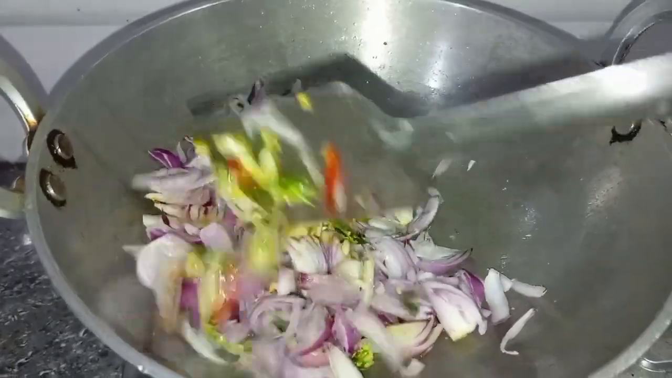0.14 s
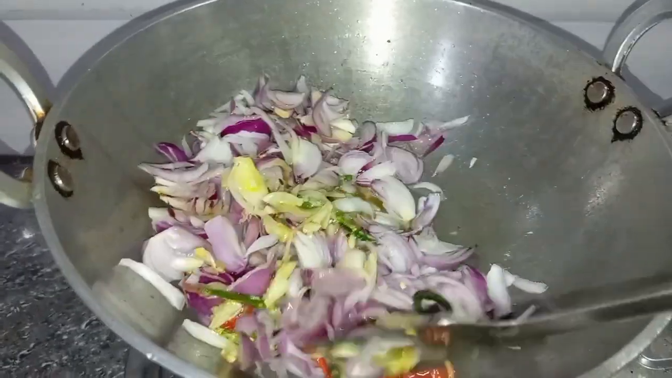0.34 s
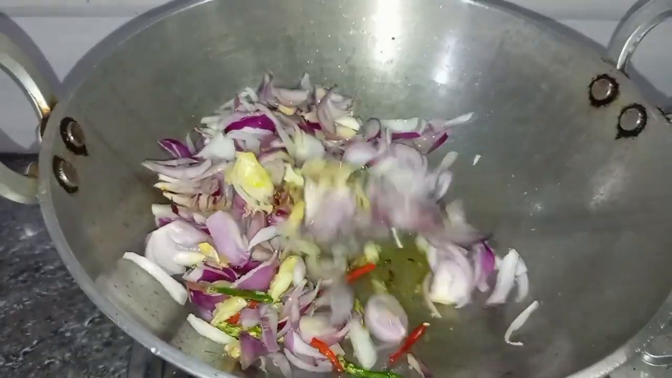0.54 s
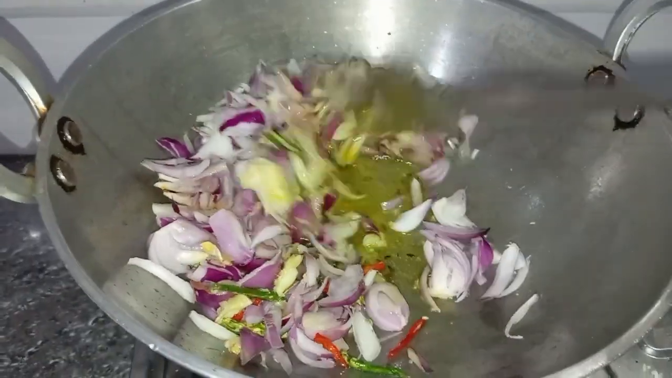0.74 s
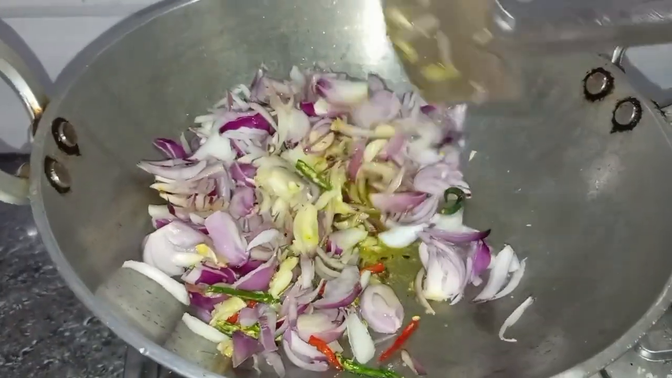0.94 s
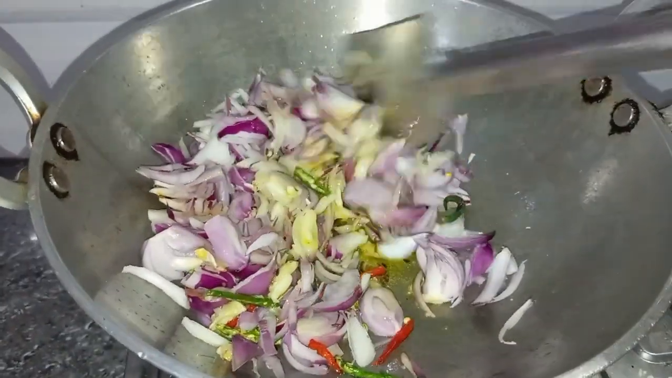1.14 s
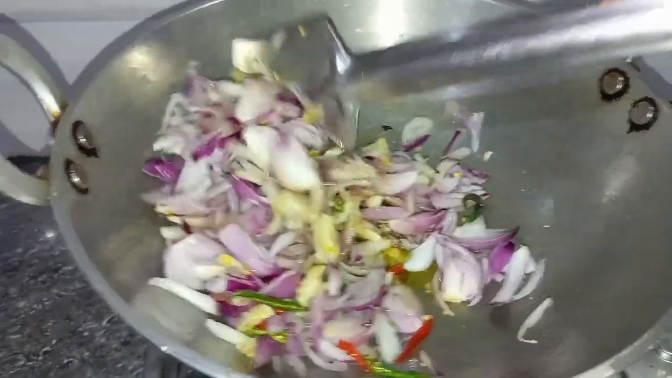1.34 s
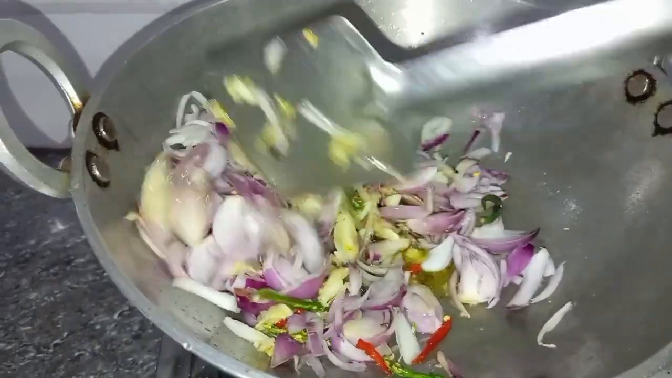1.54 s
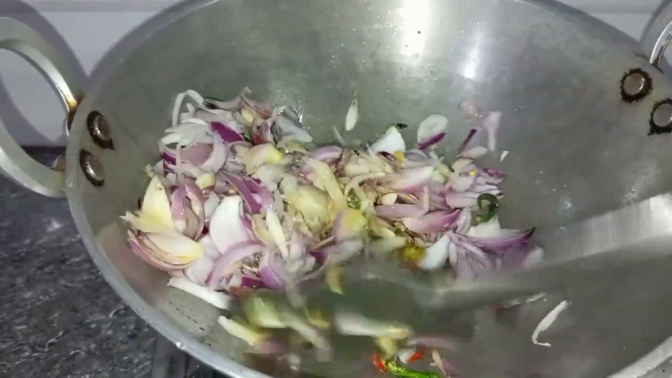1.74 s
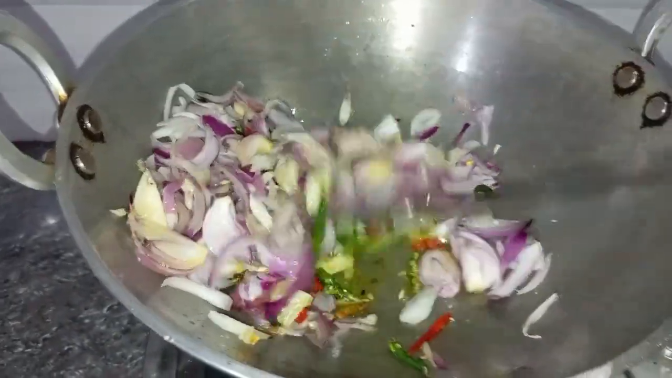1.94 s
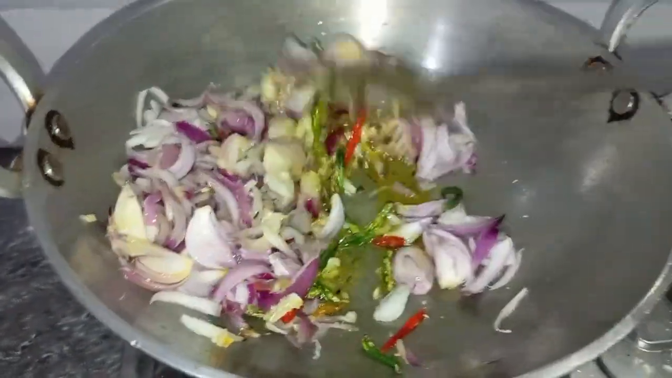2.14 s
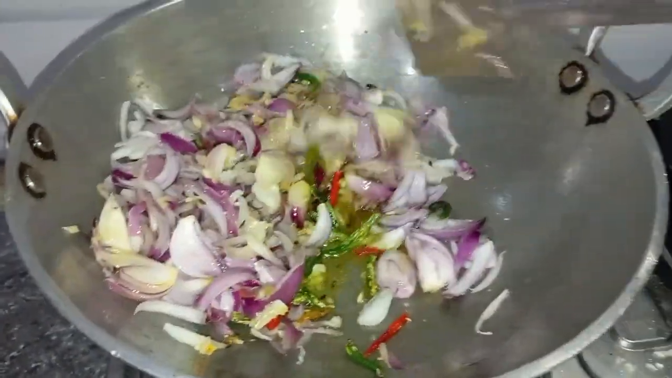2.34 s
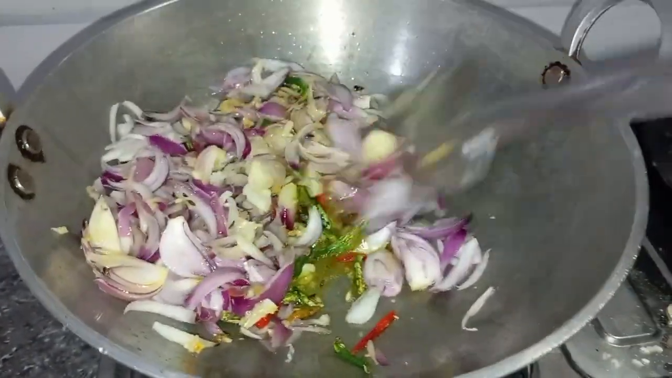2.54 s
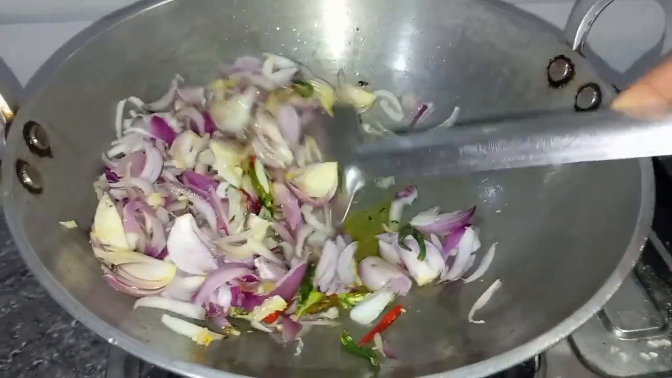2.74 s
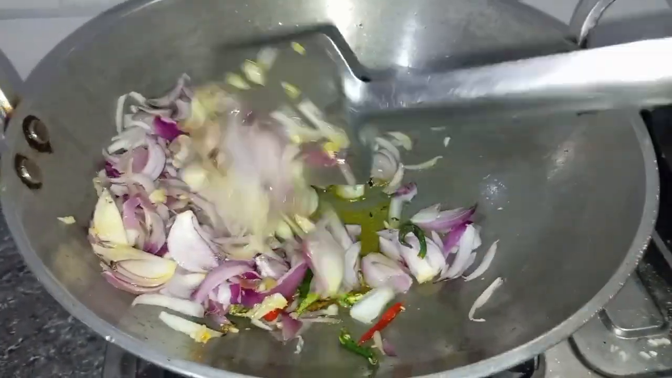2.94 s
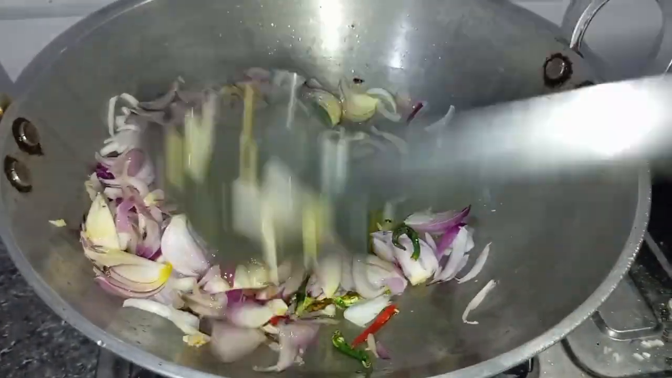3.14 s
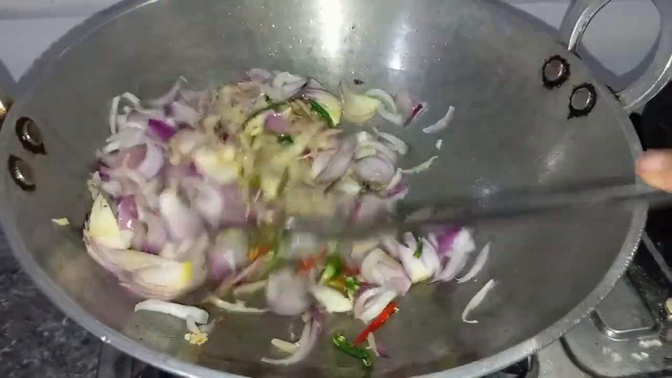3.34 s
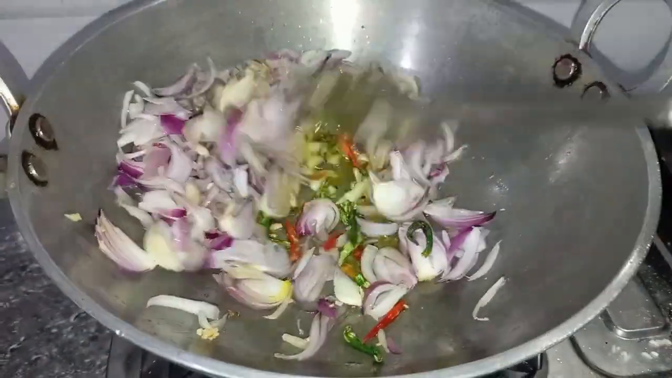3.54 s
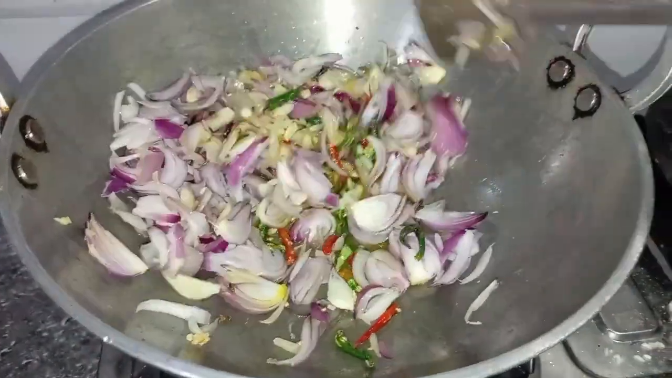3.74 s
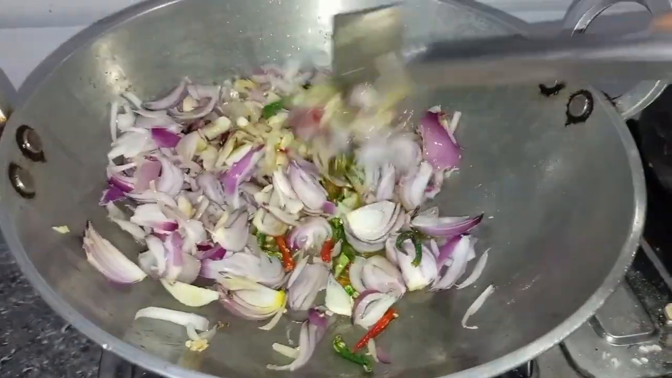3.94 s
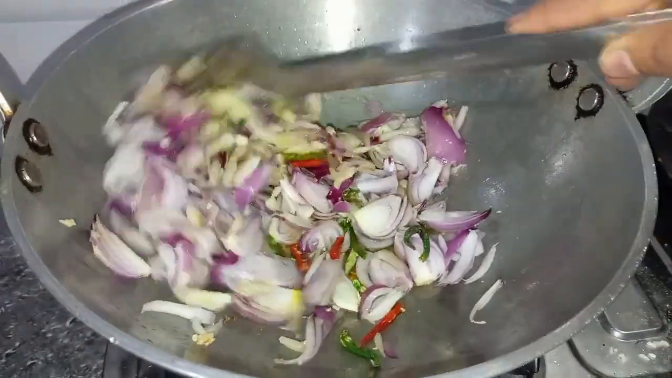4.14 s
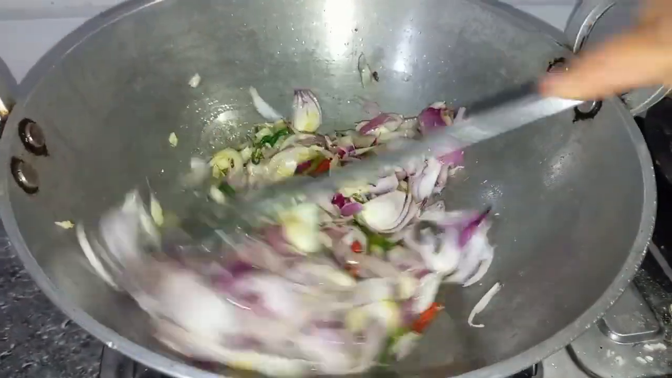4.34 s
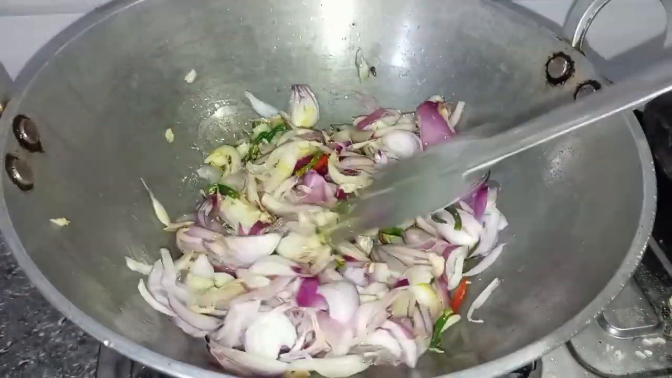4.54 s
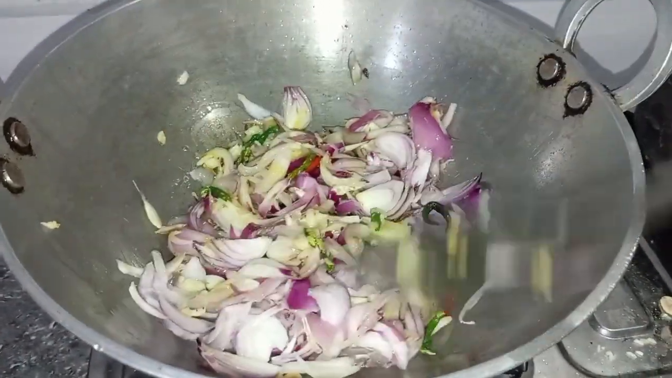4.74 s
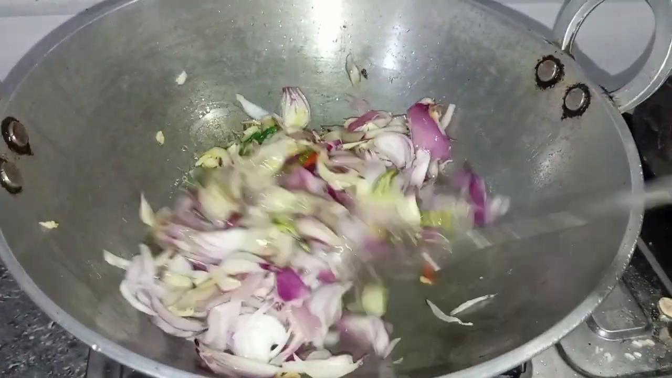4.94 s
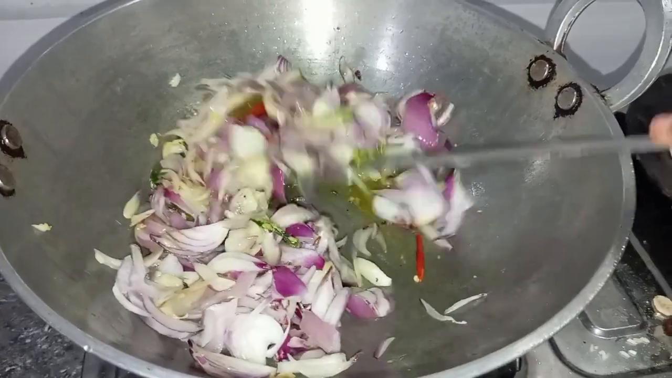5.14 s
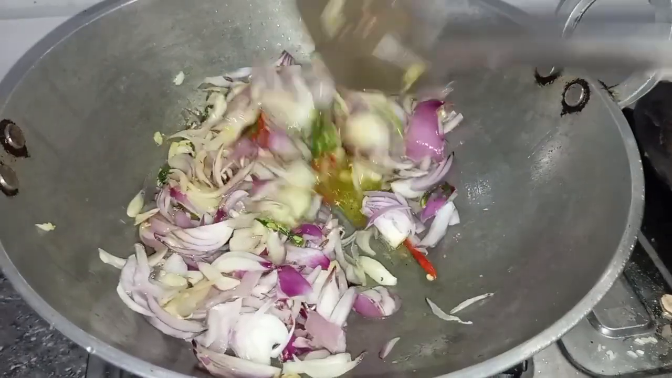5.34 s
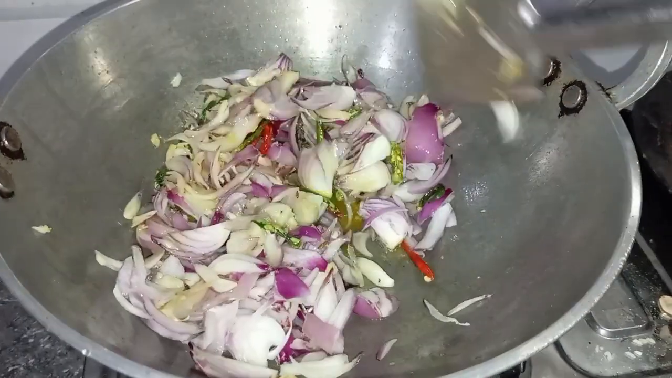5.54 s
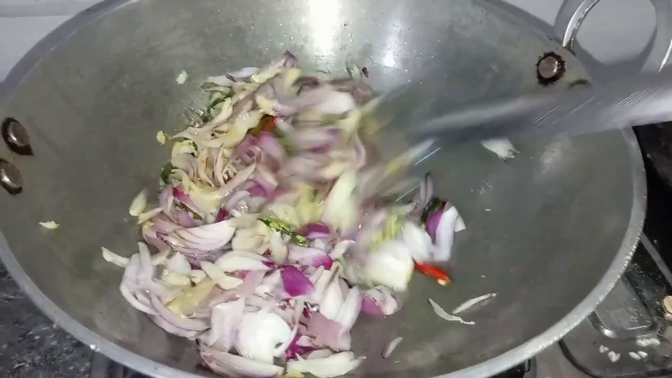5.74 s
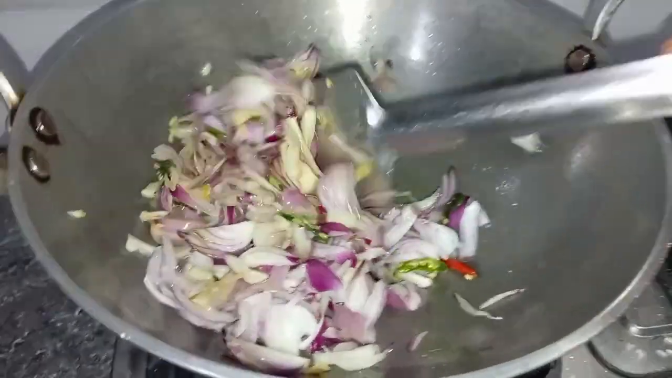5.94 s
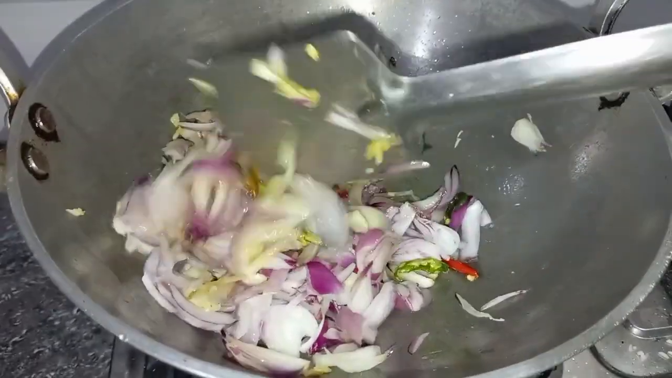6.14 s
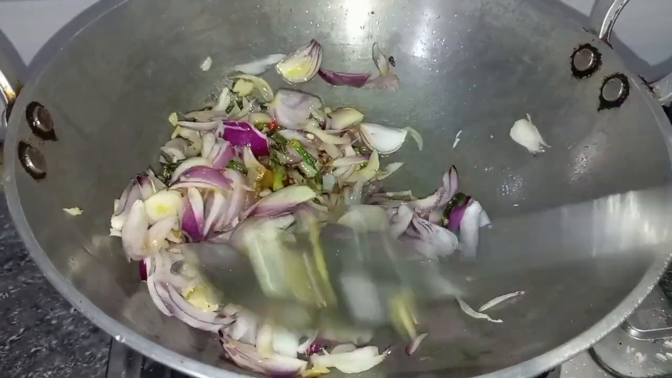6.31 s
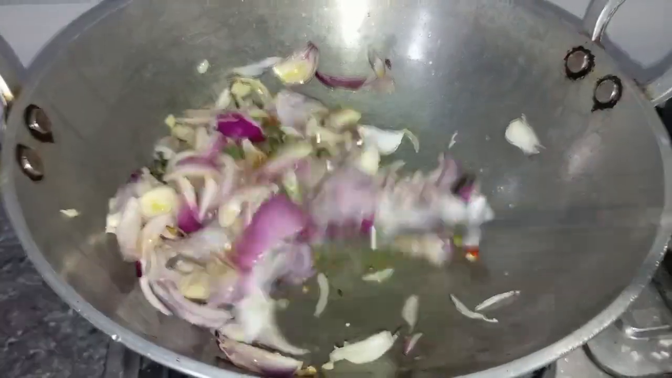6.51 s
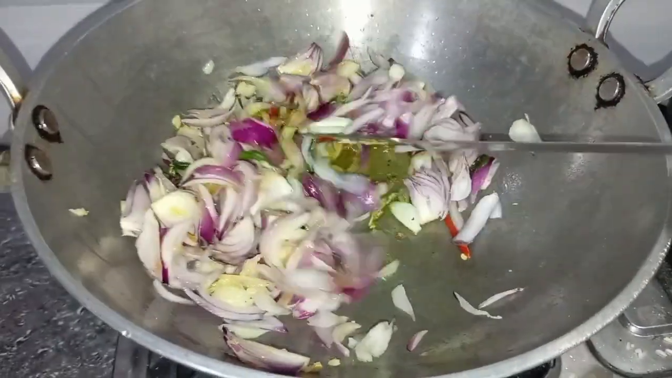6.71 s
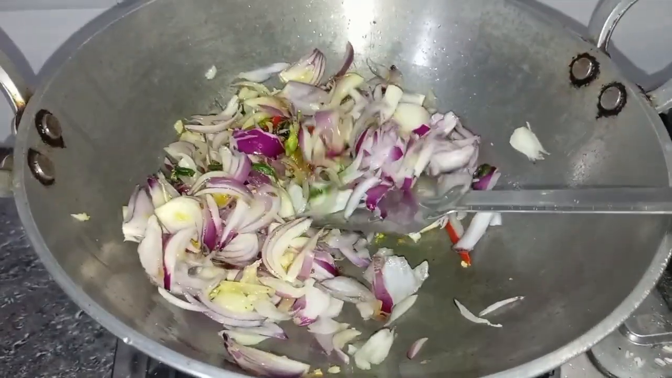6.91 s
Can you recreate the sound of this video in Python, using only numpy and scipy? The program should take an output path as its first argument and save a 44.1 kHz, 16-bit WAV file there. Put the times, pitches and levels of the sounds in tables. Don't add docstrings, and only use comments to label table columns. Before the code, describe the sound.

Close-up frying: steady onion sizzle with spitting droplets, broken by bright metal spatula clanks and gritty ringing scrapes on a pan.

```python
import sys
import numpy as np
from scipy import signal
from scipy.fft import rfft, irfft, next_fast_len
from scipy.io import wavfile
from scipy.ndimage import uniform_filter1d, minimum_filter1d

SR = 44100
rng = np.random.default_rng(int(sys.argv[2]) if len(sys.argv) > 2 else 0)


def rack_gain(trim_db):
    fader = np.asarray(trim_db, float)
    return 10 ** (fader / 20)


def transcribe(u):
    v = np.clip(np.atleast_2d(u).T, -1, 1)
    q = np.round(v * 32767).astype(np.int16)
    wavfile.write(sys.argv[1], SR, q)


N = 311919


def rms_one(x):
    return x / np.sqrt(np.mean(x ** 2) + 1e-20)


def in_time(rows):
    s, *columns = np.transpose(rows)
    return [np.interp(np.arange(N) / SR, s, c) for c in columns]


def add_at(out, s, sound):
    at = round(s * SR)
    out[at:at + len(sound)] += sound


def band(x, low_hz, high_hz):
    edges = [low_hz, min(high_hz, .4 * SR)]
    return signal.sosfilt(signal.butter(2, edges, "band", fs=SR, output="sos"), x)


def ring(x, hz, width_hz):
    r, w = np.exp(-np.pi * width_hz / SR), 2 * np.pi * hz / SR
    return signal.lfilter([.5, 0, -.5], [1, -2 * r * np.cos(w), r * r], x + 1e-18)


def focus(x, hz):
    width_hz = .12 * hz
    return ring(x, hz, width_hz) * 2 * np.pi * width_hz / SR


def sing(x, hz, width_hz):
    return ring(x, hz, width_hz) * np.sqrt(4 * np.pi * width_hz / SR)


def wander(spread_db, rate, size=N):
    r = np.exp(-80 * np.pi * rate / SR)
    slow = signal.lfilter([1], [1, -2 * r, r * r], rng.standard_normal(size // 40 + 1002))
    gain = rack_gain(spread_db * rms_one(slow)[1000:])
    return np.interp(np.arange(size) / 40, np.arange(len(slow) - 1000), gain)


def grains(per_s, spread_db):
    at = np.flatnonzero(rng.random(N) < per_s / SR)
    clicks, draw = np.zeros(N), rng.random((2, N))[:, at]
    size = np.minimum(-np.log(draw[0] + 1e-9), 4.6)
    clicks[at] = rack_gain(spread_db * size) * np.sign(draw[1] - .5)
    return rms_one(clicks)


def coloured(x, spectrum, patchy_db):
    hz, db = np.transpose(spectrum)
    size = next_fast_len(N)
    octave, out = np.log2(np.fft.rfftfreq(size, 1 / SR) + 1), 0
    bins = rfft(x, size) * rack_gain(np.interp(octave, np.log2(hz), db, left=-70))
    for centre in np.arange(np.log2(hz[0]), np.log2(hz[-1]) + 1):
        share = np.clip(1 - abs(octave - centre), 0, 1)
        out = out + wander(patchy_db, 12.7) * irfft(bins * share, size)[:N]
    return rms_one(out)


# (frequency [Hz], level per Hz [dB])
BURNER_SPECTRUM = [(18, -51), (30, -49), (96, -2.5), (257, -1.5), (408, 5), (519, 0), (824, -1.5),
                   (955, -2), (1210, 6), (2500, -21), (3250, 5), (5500, -120)]


def burner():
    hiss = rack_gain(-62) * coloured(rng.standard_normal(N), BURNER_SPECTRUM, patchy_db=2.5)
    note = wander(3.0, 3.8) * sing(rng.standard_normal(N), hz=812, width_hz=40)
    return hiss + rack_gain(-70) * note


# (time [s], peak level [dB])
JOLTS = [(.68, -64), (1.06, -60), (1.82, -59), (2.315, -52), (2.395, -48), (2.465, -50), (2.51, -51),
         (2.57, -52), (2.8, -61), (2.92, -68), (3.63, -68), (4.85, -65), (5.05, -53.5), (5.31, -62),
         (5.76, -60), (6.0, -66.5), (6.58, -59), (6.93, -68)]
# (frequency [Hz], width [Hz], level [dB])
ROCKING_MODES = [(76, 20, -5), (98, 20, -10), (48, 26, -11)]
# (time [s], peak level [dB], frequency [Hz])
BUMPS = [(0.042, -59, 315), (.33, -49, 316), (0.47, -59, 220), (0.639, -61, 165), (0.995, -36, 259),
         (1.541, -56, 221), (1.77, -50, 207), (2.125, -57.5, 230), (2.368, -46, 230), (2.37, -39.5, 306),
         (2.373, -52, 160), (2.43, -47.5, 226), (2.54, -52, 228), (1.9, -58, 304), (6.501, -66, 337),
         (0.349, -48, 317), (3.184, -51, 397), (3.252, -53, 227), (3.759, -50, 215), (3.84, -56, 208),
         (4.04, -55, 305), (4.761, -50, 224), (4.849, -48.5, 295), (5.082, -47, 450), (5.337, -50, 342),
         (5.55, -43.5, 218), (6.8, -58, 235)]


def stand():
    clock = np.arange(N) / SR
    rise_db_per_s, fall_db_per_s, rest = 500, 200, rack_gain(-75)
    rocking = np.full(N, rest)
    for s, db in JOLTS:
        rocking += rack_gain(db + np.minimum(rise_db_per_s * (clock - s), fall_db_per_s * (s - clock)))
    push = rng.standard_normal(N) * rocking
    out = np.zeros(N)
    for hz, width, db in ROCKING_MODES:
        shudder = sing(sing(push, hz, width), hz, 2 * width) * np.sqrt(8 * width / SR)
        out += rack_gain(db) * wander(2.4, 5.3) * shudder
    sway_hz = 72 * wander(.6, 8.0)
    out += rack_gain(-5) * (rocking - rest) * np.sin(2 * np.pi * np.cumsum(sway_hz) / SR)
    t = np.arange(6000) / SR
    swell = t / 0.028 * np.exp(1 - t / 0.03)
    for s, db, hz in BUMPS:
        knock = band(sing(rng.standard_normal(8000), hz, 50.0), 96, 750)[2000:]
        add_at(out, s, rack_gain(db - 6.5) * swell * knock)
    return out


# (frequency [Hz], level per Hz [dB])
CRACKLE_SPECTRUM = [(600, -42), (1100, -7), (1800, -12), (3300, 4), (4500, 2.5), (7000, -2)]


def crackle():
    clicks, dealt = grains(9000 * wander(1.5, 20), spread_db=2.5), rng.integers(0, 16, N)
    hz, db = np.transpose(CRACKLE_SPECTRUM)
    pitches = np.geomspace(800, 6500, 16)
    levels = rack_gain(np.interp(np.log(pitches), np.log(hz), db)) * np.sqrt(pitches)
    out = np.zeros(N)
    for k, f in enumerate(pitches):
        out += levels[k] * wander(4.8, 8.0) * sing(clicks * (dealt == k), f, 0.11 * f)
    return rms_one(out)


# (time [s], fizz level [dB], crackle level [dB])
FRY = [(0.0, -47, -44.5), (0.96, -43.5, -50), (1.52, -47, -74), (1.77, -47, -37), (1.91, -46, -40.5),
       (2.83, -45, -45.5), (3.21, -46.5, -46.5), (3.48, -44.5, -39), (4.17, -43, -51), (4.71, -48, -50.5),
       (4.92, -45.5, -41), (5.77, -44.5, -42.5), (6.3, -46.5, -45.5), (6.52, -43.5, -37),
       (6.81, -44.5, -53), (7.07, -46, -52)]
# (frequency [Hz], level per Hz [dB])
FIZZ_SPECTRUM = [(880, -27.5), (1500, -7), (2050, -6.5), (2270, -14.5), (2540, -8), (3000, -8), (3410, -5),
                 (4040, -7.5), (6560, 1), (9010, -2), (10500, -5.5), (10900, -12), (13400, -21.5),
                 (14900, -7.5), (16000, -2)]


def fry():
    fizz_db, crackle_db = in_time(FRY)
    clumps = wander(.9, 18)
    fizz = coloured(grains(9000, spread_db=3.7), FIZZ_SPECTRUM, patchy_db=.6)
    return rack_gain(fizz_db + 4.0) * fizz * clumps + rack_gain(crackle_db - 3.5) * crackle()


# (time [s], peak level [dB], pitch [Hz])
SPITS = [(0.6619, -16, 2800), (1.941, -16, 3440), (2.0315, -17, 4960), (2.0635, -16, 5060),
         (2.1594, -18.5, 3600), (2.2, -18, 3860), (2.2058, -17, 4100), (2.2555, -18, 2600),
         (2.278, -18, 2940), (2.3, -16, 3400), (3.045, -27, 5600), (3.104, -11.5, 6500), (3.56, -19, 6000),
         (3.5873, -18, 5600), (4.2457, -18, 4560), (4.3485, -17, 6600), (4.3807, -20, 2540),
         (4.485, -17.5, 6800), (5.855, -19, 5860), (5.875, -17, 5900), (6.0933, -23, 5400),
         (6.329, -13, 5530), (6.4691, -19, 5900), (6.721, -24, 6340)]


def spits():
    out, fade = np.zeros(N), np.exp(-np.arange(600) / (0.005 * SR))
    for s, db, hz in SPITS:
        burst = rack_gain(db - 17.5) * rng.standard_normal(600) * fade
        burst[0] = rack_gain(db)
        splash = rack_gain(-1.0) * band(burst, 1740, 7300) + rack_gain(-18.0) * band(burst, 7200, 18000)
        add_at(out, s, splash + rack_gain(-13.5) * ring(burst, hz, 0.11 * hz))
    return out


# (time [s], peak level [dB], centre frequency [Hz])
SNAPS = [(.0367, -20, 6040), (0.0702, -19, 8000), (.0865, -27, 5000), (0.116, -25, 5000), (.124, -28, 4500),
         (.147, -33, 3500), (.7736, -29, 10000), (.9602, -34, 10000), (.9847, -28, 11000),
         (1.3234, -41, 8000), (1.3488, -34, 14500), (1.349, -27, 6700), (2.1326, -30, 8000),
         (2.161, -22, 9000), (2.277, -21, 2470), (2.5182, -19.5, 10000), (2.5731, -27, 10000),
         (2.74, -27, 3000), (2.914, -32, 8000), (2.9741, -28, 14500), (3.1343, -40, 10000),
         (3.251, -32, 2500), (3.7155, -23, 3300), (3.7185, -21, 3500), (4.0946, -36, 10000),
         (4.4538, -30, 10000), (4.6406, -31, 10000), (6.722, -27, 10000), (7.0284, -29, 10000)]


def snaps():
    out, fade = np.zeros(N), np.exp(-np.arange(300) / (.0004 * SR))
    for s, db, hz in SNAPS:
        burst = rng.standard_normal(300)
        burst[0] = 4
        click = band(burst * fade, .55 * hz, 1.6 * hz)
        add_at(out, s, rack_gain(db) * click / abs(click).max())
    return out


# (start time [s], end time [s], level [dB])
SQUEALS = [(.34, 0.386, -41.5), (.35, 0.424, -50), (0.401, 0.473, -49), (0.414, 0.504, -51.5),
           (0.419, 0.473, -47.5), (0.528, 0.583, -48.5), (0.563, 0.622, -49.5), (.668, 0.698, -48),
           (1.005, 1.052, -39.5), (1.01, 1.09, -47), (1.06, 1.172, -48.5), (1.125, 1.187, -42.5),
           (1.13, 1.23, -49.5), (1.76, 1.85, -49), (1.784, 1.823, -41), (1.788, 1.846, -34.5),
           (1.8, 1.877, -41), (2.026, 2.115, -49.5), (2.431, 2.478, -41.5), (2.435, 2.53, -38.5),
           (2.46, 2.54, -40), (2.5, 2.527, -33.5), (2.507, 2.568, -39), (2.536, 2.593, -31.5),
           (2.541, 2.61, -40.5), (2.61, 2.658, -35), (3.271, 3.285, -33), (3.28, 3.376, -49.5),
           (3.704, 3.751, -50.5), (3.774, 3.839, -43.5), (3.787, 3.847, -52), (3.99, 4.06, -55),
           (4.0, 4.075, -42.5), (4.0, 4.083, -50), (4.117, 4.183, -54), (4.759, 4.82, -48.5),
           (4.799, 4.87, -50), (4.766, 4.81, -51), (4.92, 4.985, -47), (4.93, 4.968, -46),
           (5.0, 5.043, -49.5), (5.03, 5.09, -47), (5.68, 5.708, -31.5), (5.685, 5.755, -34),
           (5.686, 5.715, -36), (5.723, 5.733, -33), (6.37, 6.6, -48), (6.42, 6.545, -48),
           (6.606, 6.657, -47), (6.79, 6.807, -47), (6.79, 6.86, -52), (6.84, 6.904, -54),
           (6.36, 6.43, -46), (6.45, 6.51, -49), (6.52, 6.57, -44), (6.55, 6.69, -52), (6.68, 6.72, -51),
           (6.45, 6.52, -48), (6.5, 6.57, -49), (3.3, 3.385, -48)]
SQUEAL_HZ = [2860, 3850, 1590, 1000, 3500, 3390, 1000, 2540, 3275, 2380, 3300, 4740, 2500, 6400, 7300, 5010,
             3460, 3900, 425, 6430, 7250, 5900, 1600, 3480, 2650, 3390, 3850, 522, 3300, 425, 1640, 1180,
             535, 930, 1200, 6300, 420, 1340, 3820, 3500, 1150, 3480, 5070, 3455, 1645, 5050, 3480, 1620,
             2420, 1330, 3850, 900, 5030, 2570, 2510, 1165, 2200, 5340, 3850, 1030]


def squeals():
    out = np.zeros(N)
    for (start, end, db), hz in zip(SQUEALS, SQUEAL_HZ):
        t = np.arange(round((start - .01) * SR), round((end + 0.014) * SR)) / SR
        swell = np.interp(t, [start - .01, start + 0.011, end - .005, end + 0.013], [0, 1, 1, 0])
        pitch_hz = hz * wander(0.1, 40.0, size=N // 20)[:len(t)]
        tremor = wander(3.3, 60.0, size=N // 20)[:len(t)]
        tone = np.sin(2 * np.pi * np.cumsum(pitch_hz) / SR)
        add_at(out, t[0], rack_gain(db + 2.5) * swell * tremor * tone)
    return out


# (start time [s], length [s], force level [dB], brightness [dB], wall level [dB])
SKIDS = [(0.346, 0.25, -44.5, 4.5, -1), (1.007, 0.13, -30.5, -3, -5), (1.743, 0.24, -42, 8.5, 2),
         (2.022, 0.065, -67.5, 26, 16), (2.426, 0.1, -38.5, 1, -23), (3.267, 0.19, -39, -9, -3),
         (3.756, 0.49, -46, -1.5, -12.5), (3.972, 0.044, -34.5, -28, -19), (4.77, 0.15, -40, -1.5, -6),
         (5.549, 0.11, -36, -3, -10), (6.358, 0.41, -47.5, 5, -1), (6.775, 0.16, -44, 0, 0)]
# (peak time [s], length [s], force level [dB], brightness [dB], wall level [dB])
DIGS = [(0.575, 0.24, -47.5, 0, 3), (0.75, 0.16, -66.5, 25.5, 3), (1.13, 0.074, -30, -12, -17),
        (1.193, 0.21, -35.5, -9, -6.5), (1.328, .14, -53, -22, -10), (1.855, 0.27, -44.5, 7, 5.5),
        (2.207, 0.4, -76.5, 32.5, 25), (2.295, 0.041, -69, 30, 28.5), (2.574, 0.37, -42, 13, 3),
        (3.367, 0.15, -54.5, 16, 5), (4.037, 0.24, -32, -35, -16), (4.143, 0.19, -54, 1, 5),
        (4.394, 0.046, -55.5, 9, 11.5), (4.92, 0.2, -56.5, 3, 9), (5.04, 0.16, -58, 10, 9),
        (5.732, 0.39, -46, 2.5, -5), (6.533, 0.48, -45.5, 6, 2.5), (6.674, 0.55, -51, -4, -24)]


def efforts():
    t, power = np.arange(N) / SR, np.full((3, N), 1e-14)
    rise_s, lift_s = 0.01, 0.01
    shapes = []
    for s, length, *levels in SKIDS:
        times = [s, s + rise_s, s + length, s + length + lift_s]
        shapes.append((times, [-40, 0, -13, -50], levels))
    for s, length, *levels in DIGS:
        half = length / 2
        times = s + np.array([-half - lift_s, -half, -length * 0.15, 0, length * 0.14, half, half + lift_s])
        shapes.append((times, [-50, -20.5, -2.5, 0, -2.5, -20.5, -50], levels))
    for times, shape_db, (force_db, bright_db, wall_db) in shapes:
        span = slice(round(times[0] * SR), round(times[-1] * SR))
        part_db = np.array([[0], [wall_db], [bright_db]])
        power[:, span] += rack_gain(np.interp(t[span], times, shape_db) + force_db + part_db) ** 2
    return np.sqrt(power)


# (frequency [Hz], width [Hz])
FAMILIES = [
    [(420, 10), (510, 25), (560, 9.9), (630, 22)],
    [(820, 40), (1000, 38), (1140, 60), (1240, 66), (1400, 45), (1600, 30), (1900, 49), (2170, 70)],
    [(2480, 42), (2650, 18), (2860, 45), (3270, 55), (3460, 32), (3810, 49), (4270, 29)],
    [(4790, 48), (5020, 22), (5200, 45), (5450, 53), (5800, 19), (6100, 56), (6430, 6.7), (6850, 32),
     (7330, 8)],
]
PARTNERS = [0.848, 0.665, 0.764, 1.247]
# (time [s], bowl frequency [Hz], wall frequency [Hz], blade frequency [Hz])
PLACE = [(.34, 398, 1450, 3770), (.45, 477, 1020, 3620), (.55, 520, 1250, 3600), (1.0, 420, 806, 3200),
         (1.07, 430, 1350, 3240), (1.12, 546, 1640, 3200), (1.2, 537, 1050, 2500), (1.72, 415, 1397, 3810),
         (1.82, 508, 1650, 3620), (2.05, 530, 1610, 3740), (2.25, 523, 1980, 3830), (2.3, 520, 1320, 3270),
         (2.42, 416, 1450, 3270), (2.5, 522, 1590, 3500), (2.65, 490, 1640, 3580), (3.26, 510, 1074, 3800),
         (3.35, 490, 1080, 3600), (3.42, 528, 1270, 2700), (3.75, 420, 1480, 3700), (3.85, 450, 1590, 3440),
         (3.93, 516, 1600, 2670), (3.99, 517, 960, 2980), (4.1, 542, 1230, 2930), (4.75, 420, 1340, 3770),
         (4.95, 503, 1170, 3700), (5.08, 444, 1110, 3440), (5.54, 417, 1340, 4270), (5.62, 433, 1365, 3800),
         (5.7, 547, 1630, 3530), (6.35, 400, 1510, 3730), (6.5, 514, 1700, 3480), (6.66, 523, 1230, 2430),
         (6.8, 453, 1310, 3810), (6.84, 430, 1250, 3860), (6.87, 420, 880, 2700)]
# (touch-down frequency [Hz], dug-in frequency [Hz], settling time [s])
EDGE_SPOT = (5270, 4950, .08)


def drag():
    out, grit = np.zeros(N), grains(8000, spread_db=2.4) * wander(1.5, 40)
    t, starts = np.arange(N) / SR, np.array([0] + [skid[0] for skid in SKIDS])
    age = t - starts[np.searchsorted(starts, t, "right") - 1]
    bowl, wall, blade = efforts()
    edge = blade * rack_gain(-4 + 10.5 * np.exp(-age / 0.17))
    fresh_hz, dug_hz, settle_s = EDGE_SPOT
    spots = [*in_time(PLACE), dug_hz + (fresh_hz - dug_hz) * np.exp(-age / settle_s)]
    lag = .0003 * SR * np.log(wander(8.7, 3))
    for effort, modes, spot_hz, ratio in zip([bowl, wall, blade, edge], FAMILIES, spots, PARTNERS):
        force, near, shares = grit * effort, np.log(spot_hz[::40]), []
        lowest_hz, highest_hz = modes[0][0], modes[-1][0]
        for hz, _ in modes:
            main = np.exp(-((np.log(hz) - near) / .07) ** 2)
            partner = np.exp(-((np.log(hz / ratio) - near) / .07) ** 2)
            shares.append(np.repeat(.17 + main + .45 * partner, 40)[:N] * wander(2.8, 14.0))
        fed = rack_gain(-3.07) * force / np.sqrt(sum(share ** 2 for share in shares))
        sound = rack_gain(-14) * force * np.sqrt(SR / highest_hz)
        for share, (hz, width_hz) in zip(shares, modes):
            bent = np.arange(N) - np.roll(lag, rng.integers(N))
            sound += np.interp(bent, np.arange(N), sing(fed * share, hz, width_hz))
        sound = band(sound, lowest_hz * 0.79, highest_hz * 1.62)
        out += band(sound, lowest_hz * 0.6, highest_hz * 1.74)
    return signal.sosfilt(signal.butter(8, 10600, fs=SR, output="sos"), out)


# (time [s], frequency [Hz], peak level [dB])
RINGS = [(0.334, 2830, -29), (0.344, 2824, -29), (.345, 4950, -26), (.345, 4280, -28), (.334, 7330, -25),
         (.334, 6640, -32), (.334, 8060, -31), (1.001, 6270, -37), (1.008, 7380, -30), (1.008, 9020, -25),
         (1.006, 2400, -36), (.998, 824, -24.5), (.998, 630, -32), (.998, 312, -32), (1.731, 2720, -26),
         (1.739, 5800, -23), (1.738, 6210, -27), (1.729, 7600, -39), (1.73, 8570, -30), (1.73, 9730, -25),
         (1.735, 1920, -38), (2.423, 5100, -32), (2.426, 6030, -28), (2.426, 8000, -23.5),
         (2.425, 9660, -21.5), (2.426, 9050, -31), (2.426, 7600, -33), (2.426, 10600, -34),
         (2.426, 15200, -30), (3.266, 2580, -41), (3.264, 3854, -29.5), (3.265, 505, -30.5),
         (3.266, 1037, -34), (6.34, 2030, -38), (4.755, 1340, -30.5), (3.756, 6450, -29),
         (3.756, 7000, -32), (3.756, 4300, -43), (3.756, 8620, -25), (4.751, 8850, -25.5),
         (4.761, 8850, -34), (4.761, 4200, -32), (4.761, 6200, -29), (4.753, 3920, -33),
         (4.761, 10000, -30), (4.754, 2420, -42), (5.541, 4290, -32), (5.54, 5270, -34), (5.541, 5650, -30),
         (5.541, 6460, -33.5), (5.54, 7100, -29), (5.54, 7770, -27), (5.541, 9020, -22), (6.339, 3760, -25),
         (6.339, 5200, -25), (6.338, 6680, -25), (6.35, 6380, -33), (6.34, 8800, -35), (6.34, 8040, -30),
         (6.34, 2800, -43)]


def rings():
    out, fade = np.zeros(N), np.exp(-np.arange(3000) / (0.0023 * SR))
    for s, hz, db in RINGS:
        tone = focus(ring(rng.standard_normal(3000) * fade, hz, width_hz=61), hz)
        add_at(out, s, rack_gain(db) * tone / abs(tone).max())
    return out


# (time [s], tip level [dB], edge level [dB], edge frequency [Hz], weight on the pan [dB])
LANDINGS = [(0.331, -19, -18.5, 5090, -43.5), (0.343, -24, -23.5, 5200, -41),
            (0.9995, -21, -24, 5400, -17.5), (1.0108, -22, -29, 5400, -24), (1.729, -15, -20, 5210, -33.5),
            (1.74, -22.5, -32, 4950, -39), (2.4204, -16, -23.5, 6900, -36), (2.4256, -21, -38, 6400, -27.5),
            (3.2629, -38, -35, 4930, -32.5), (3.7551, -18, -24, 5530, -37), (3.766, -33, -33, 5500, -40),
            (4.7505, -14, -33, 5120, -44), (4.762, -21, -27.5, 5140, -35),
            (5.5385, -15, -30.5, 6190, -20.5), (6.3375, -22.5, -23, 5170, -39),
            (6.3541, -32.5, -35, 6420, -39), (6.8404, -44, -31, 5260, -45)]
# (tip level [dB], rise time [s])
SOFT_LANDING = [(-38, .002), (-31, .0004)]
# (frequency [Hz], width [Hz])
TIP_MODES = [(8000, 120), (8700, 17), (9700, 23.5), (11100, 290), (15100, 110)]


def clanks():
    out, t = np.zeros(N), np.arange(3500) / SR
    place_s, _, place_wall_hz, place_blade_hz = np.transpose(PLACE)
    pan_leads_s = 0.00151
    for s, tip_db, edge_db, edge_hz, pan_db in LANDINGS:
        rise_s = np.interp(tip_db, *np.transpose(SOFT_LANDING))
        fade = (1 - np.exp(-t / rise_s)) * np.exp(-t / (.002 + rise_s))
        flat_to_corner_hz = [5274, 5400]
        wall_db = pan_db + np.interp(edge_hz, flat_to_corner_hz, [7.5, -5.5])
        blade_db = edge_db + np.interp(edge_hz, flat_to_corner_hz, [-2.5, -9.5])
        wall_hz = min(np.interp(s, place_s, place_wall_hz), 1440)
        blade_hz = np.interp(s, place_s, place_blade_hz)
        struck = [(pan_leads_s, pan_db, FAMILIES[0][0][0], 30.0),
                  (pan_leads_s, wall_db, wall_hz, 45.0),
                  (0, blade_db, blade_hz, 45.0),
                  (0, edge_db, edge_hz, 60.0),
                  (0, tip_db + 0.5, 9020, 900.0)]
        for (lead_s, db, hz, width_hz), modes in zip(struck, FAMILIES + [TIP_MODES]):
            force = rack_gain(db) * rng.standard_normal(3500) * fade / np.linalg.norm(fade)
            sound = focus(ring(force, hz, width_hz), hz)
            for f, w in modes:
                answer_db, bend = -15 + 2.2 * rng.standard_normal(), 1 + .015 * rng.standard_normal()
                sound += rack_gain(answer_db) * focus(ring(force, f * bend, w * 1.3), f)
            sound += rack_gain(-21.0) * force
            add_at(out, s - lead_s - .0005, band(sound, modes[0][0] * 0.55, modes[-1][0] * 1.5))
        tick = band(rng.standard_normal(3500) * np.exp(-t / .0008), 12000, 18000)
        thud = band(rng.standard_normal(3500) * np.exp(-t / 0.013), 200, 710) * 10
        blow = rack_gain(tip_db - 8) * tick + rack_gain(pan_db - 26.5) * thud
        add_at(out, s - struck[-1][0] - .0005, blow)
    return out


def scene():
    spatula = clanks() + rings() + drag() + squeals()
    return np.tile(fry() + spits() + snaps() + spatula + stand() + burner(), (2, 1))


def band_limit(x):
    return signal.sosfilt(signal.butter(12, 16960, fs=SR, output="sos"), x)


def record(dry):
    duck_db, duck_s = -5, 0.031
    loud = uniform_filter1d(dry[0] ** 2, size=88)
    ahead = np.roll(-minimum_filter1d(-loud, size=round(duck_s * SR)), -round(duck_s * SR / 2))
    before = signal.lfilter([.002], [1, -.998], loud)
    jump = np.clip(np.log10((ahead + 1e-12) / (before + 1e-12)) - 1.2, 0, 1)
    x = dry * rack_gain(duck_db * uniform_filter1d(jump, size=60))
    x = signal.sosfilt(signal.butter(2, 34, "high", fs=SR, output="sos"), x)
    x = signal.sosfilt(signal.cheby2(12, 45, 15950, fs=SR, output="sos"), x)
    return band_limit(x)


dry = scene()
out = record(dry)
transcribe(out)
```